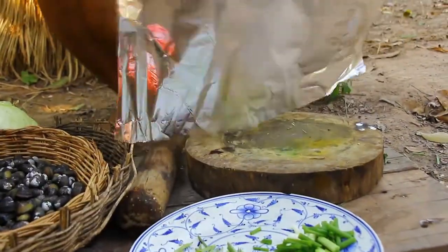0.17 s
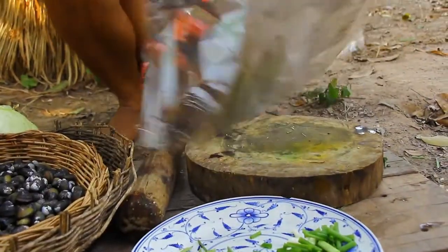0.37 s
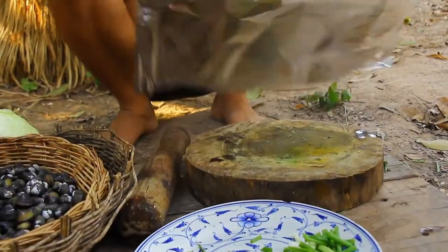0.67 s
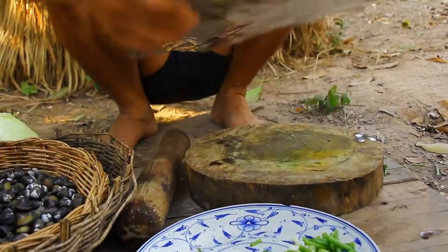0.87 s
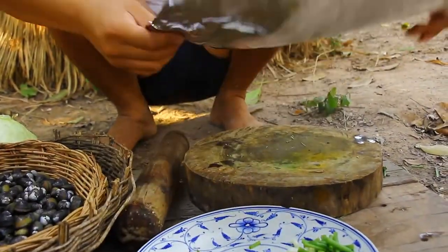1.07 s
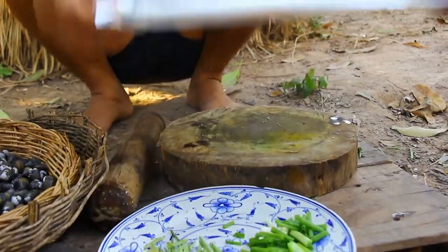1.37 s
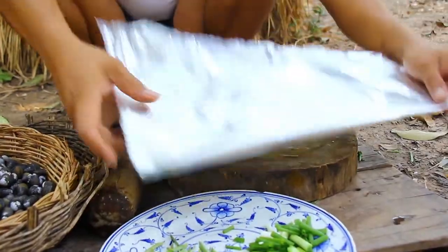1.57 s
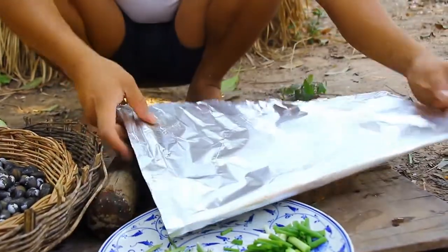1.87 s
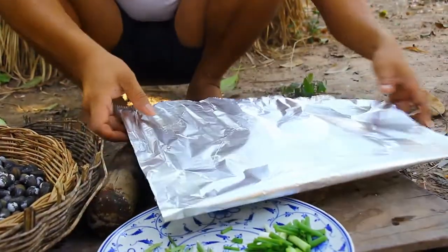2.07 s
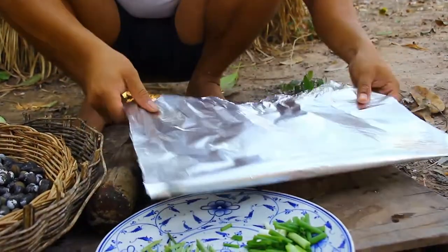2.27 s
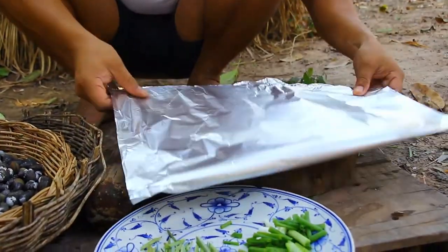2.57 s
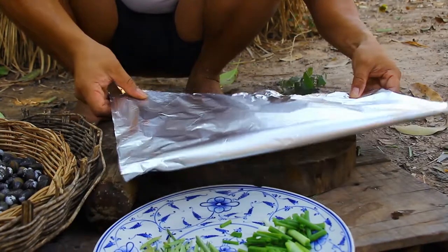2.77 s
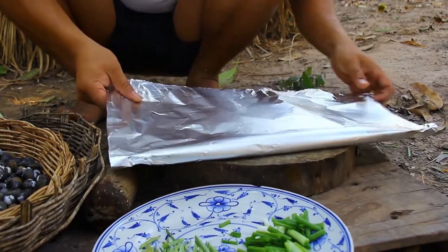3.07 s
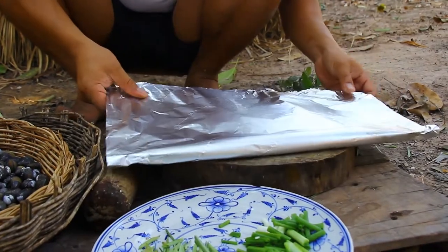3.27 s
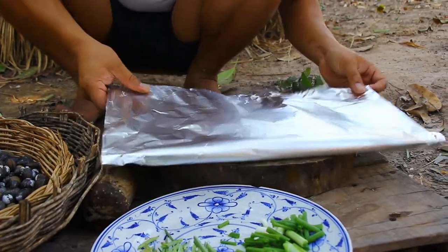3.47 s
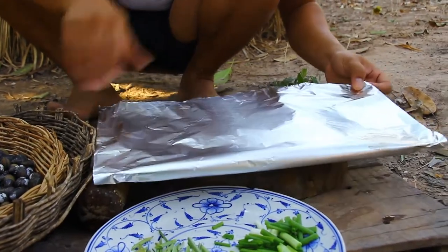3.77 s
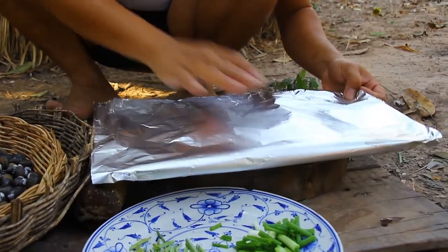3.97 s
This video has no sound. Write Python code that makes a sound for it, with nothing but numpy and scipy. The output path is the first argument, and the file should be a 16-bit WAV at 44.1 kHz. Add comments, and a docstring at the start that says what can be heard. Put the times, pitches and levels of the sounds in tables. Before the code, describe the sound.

Outdoors, close up, hands flex a loose sheet of aluminium foil, which flaps and buckles in bright bursts. After a short lull it is laid on a chopping block with a loud crinkle and one small knock, then pressed flat in more runs of crackling and tiny metallic pings. A far-off engine hums under a steady low rumble, and faint wind brushes the microphone near the end.

```python
"""Outdoors, a sheet of aluminium foil is drawn out in the air, laid over a chopping block and pressed
down by hand. Its creases snap in dense runs and buckle in bursts, and every snap sets the thin sheet
shimmering for a moment. Taut panels ring, dimples ping, the whole sheet flaps, and once it knocks on
something hard. Behind it sit a distant engine hum, an outdoor rumble and a little low wind."""
import sys
import numpy as np
from scipy import signal
from scipy.fft import rfft, irfft, next_fast_len
from scipy.io import wavfile
from scipy.ndimage import map_coordinates

SR = 44100
rng = np.random.default_rng(int(sys.argv[2]) if len(sys.argv) > 2 else 0)


def generate_wav(signal):
    """Clip the signal to [-1, 1] and save it as 16-bit WAV at the path in sys.argv[1]."""
    frames = np.transpose(np.atleast_2d(signal))
    scaled = np.clip(frames, -1, 1) * 32767
    pcm = np.round(scaled).astype(np.int16)
    wavfile.write(sys.argv[1], SR, pcm)


N = 182260
TIME = np.arange(N) / SR
RING_SIZE = SR // 4

# steady flexing; body is how much the broad panels flap along: t/s, crackle level/dB, body/dB
FLEXING = [(0, -21, 2), (.45, -25.5, -1), (.66, -28.5, -2), (.76, -34, 1), (.87, -27, -2.5),
           (1.08, -28, -1), (1.17, -30.5, -1), (1.37, -30, -2), (1.41, -35, -4), (1.66, -31.5, -7),
           (1.74, -29, 1), (1.88, -27, -6.5), (2.1, -24.5, -3), (2.42, -22, -1.5), (2.77, -27, -0.5),
           (3.14, -25.5, 2), (3.24, -34, 7.5), (3.48, -25, 2), (3.72, -28.5, -2), (4.13, -32.5, 3)]
# the hands crumple the sheet in dense runs of snaps: t/s, length/s, level/dB
CRUMPLE_RUNS = [(.003, 0.074, -21), (0.23, 0.095, -22), (0.347, 0.083, -21), (0.545, 0.16, -22),
                (0.824, 0.048, -27.5), (0.922, 0.14, -21), (1.55, 0.066, -23.5), (1.729, 0.091, -17.5),
                (1.88, 0.11, -24), (2.253, 0.1, -16.5), (2.45, 0.16, -25.5), (2.849, 0.25, -24),
                (3.064, 0.058, -19), (3.491, .13, -23.5)]
# big buckles, each a quick avalanche of snaps: t/s, level/dB, brightness/dB
BIG_BUCKLES = [(.009, -15.5, 4), (.137, -16, 1), (.159, -14, 2), (.227, -13, 2.5), (.346, -10.5, 2),
               (.4, -19, 6), (.4668, -9.5, 1.5), (.568, -20.5, 7), (.655, -17.5, 2), (.8, -28.5, 5),
               (1.0, -14, -3), (1.118, -22.5, -1), (1.242, -22.5, 3.5), (1.338, -21.5, -18),
               (1.4505, -30, 9), (1.496, -24.5, -9), (1.55, -24, 13), (1.735, -11.5, -2), (1.795, -13, 3),
               (2.059, -16.5, 4), (2.162, -18.5, -2), (2.364, -21, 14), (2.456, -16.5, -3),
               (2.481, -20.5, 10), (2.535, -13, 0), (2.648, -14.5, -1), (2.772, -27, 7), (2.805, -31, 12),
               (2.864, -14.5, -7), (2.887, -16, 0), (2.94, -16, -10), (2.959, -16.5, 8), (3.1, -20, 5),
               (3.235, -31, 5), (3.313, -29, 7), (3.35, -25, -7), (3.3735, -22, 7.5), (3.416, -26.5, 8.5),
               (3.569, -17.5, -3), (3.761, -23.5, 6.5), (3.802, -19.5, -3), (3.868, -22, -4),
               (3.93, -20, 0), (3.954, -20, -2), (3.992, -21.5, -1), (4.036, -20, -3), (4.059, -24, 2)]
# the tail of a snap, by band: f/Hz, t60/s, energy share of the first crack, brightness tracking (0-1)
SHIMMER_BANDS = [(200, 0.038, 0.24, 0), (900, 0.095, 0.29, 0), (2700, 0.26, 0.41, 0),
                 (6400, 0.12, 0.16, 0.56), (9500, 0.092, 0.2, 0.72), (14000, 0.058, 0.14, 1)]
# panels ringing while held taut: middle t/s, length/s, f/Hz, boost/dB
TAUT_PANELS = [(.36, 0.5, 624, 8), (0.499, 0.96, 1360, 3), (1.15, 0.56, 830, 1.5), (1.52, 0.16, 2520, 6.5),
               (2.38, 0.4, 1070, 8.5), (2.42, 0.58, 2280, 4.5), (2.8, 0.17, 580, 11.5),
               (3.32, 0.15, 715, 6), (3.78, 0.33, 1290, 6), (3.7, 0.74, 372, 10.5)]
# EQ of the sheet hanging free: f/Hz, level/dB
FREE_EQ = [(60, -23), (130, -7.5), (280, -3.5), (450, -16.5), (800, -4.5), (1200, -8), (2000, -2.5),
           (2900, -0.5), (4300, -1.5), (6000, -1), (7500, -3), (9500, -10), (13000, -12.5), (16000, -18.5)]
# EQ of the sheet lying on the block: f/Hz, level/dB
LAID_EQ = [(150, -29), (300, -11), (500, -17), (730, -3), (1050, -12.5), (1500, -0.5), (2300, -1),
           (3300, -1.5), (4300, -3), (5100, -0.5), (7300, -3.5), (9500, -11.5), (13000, -15),
           (16000, -18.5)]
# dull flaps of the whole sheet: t/s, level/dB, f/Hz
SHEET_FLAPS = [(.085, -14.5, 239), (.145, -23, 185), (.35, -19, 228), (.41, -21.5, 245), (.471, -32, 196),
               (.995, -21, 129), (1.736, -24, 707), (1.741, -23, 310), (3.11, -18, 209)]
# dimples popping through with a pitch: t/s, level/dB, f/Hz
DIMPLE_PINGS = [(.4672, -15, 4050), (1.387, -16, 7300), (1.496, -20, 5940), (1.572, -17, 2670),
                (1.663, -20.5, 1870), (2.655, -23, 2410), (3.1, -9, 1760), (3.3502, -17, 4240)]
# the foil knocks on something hard: t/s, level/dB
KNOCK_HITS = [(2.0756, -13.5)]
# modes of that knock: f/Hz, level/dB, t60/s
KNOCK_RING = [(453, -12, 0.045), (820, -2, 0.019), (1080, 5, 0.0072), (2380, 2, 0.013), (4000, 2, 0.0062)]
# engine hum: multiple of the firing rate, level/dB
ENGINE_PARTIALS = [(2, -56), (3, -55), (5, -56.5), (6, -39), (7, -46.5), (9, -46), (10, -44.5), (15, -60)]
# EQ of the outdoor rumble: f/Hz, level/dB
RUMBLE_EQ = [(20, -22), (38, -13), (58, 1.5), (95, -1), (130, 4.5), (200, 1.5), (320, -1), (400, -15.5),
             (520, -9.5), (750, -12), (1100, -14.5), (3000, -6), (8000, -34), (16000, -42)]
# shared fader for engine and rumble: t/s, level/dB
DISTANT_FADER = [(0, -1.5), (.5, -9), (1.1, 1), (4.13, 0.9)]
# swell of the wind: t/s, level/dB
WIND_FADER = [(0, -72), (3, -58), (4.13, -48)]
# EQ of the wind: f/Hz, level/dB
WIND_EQ = [(15, -14), (30, -25), (48, 16), (70, 7), (130, -24), (400, -60), (2000, -90)]

LOWERING_S = (1.63, 1.79)   # the sheet comes down onto the block
USUAL_LEVEL_DB = -25.5   # reference for crackle brightness and buckle length


def foil(free_treble_db=-3.5, laid_treble_db=-6, treble_tracking=0.15):
    """Crackle and buckles sound through the sheet: crisper when flexed hard, duller on the block."""
    flex_db, body_db = in_time(FLEXING)
    laid = np.interp(TIME, LOWERING_S, [0, 1])
    level_db = 10 * np.log10(from_db(flex_db) ** 2 + crumples())
    treble_db = (1 - laid) * free_treble_db + laid * laid_treble_db
    treble_db += treble_tracking * (level_db - USUAL_LEVEL_DB)
    sheet = crackle(level_db, treble_db) + buckles(BIG_BUCKLES + small_buckles(flex_db))
    sheet = panels(low_shelf(sheet, body_db, corner_hz=1200))
    return (1 - laid) * coloured(sheet, FREE_EQ) + laid * coloured(sheet, LAID_EQ)


def crackle(level_db, treble_db, snaps_per_s=870, bright_spread_db=7, flicker_db=2.5):
    """Creases snap at random, in dull and sharp clumps; harder flexing makes them come faster."""
    chance = np.clip(snaps_per_s * from_db(level_db - np.mean(level_db)) / SR, 1e-4, 1)
    sizes = snap_sizes(N, spread_db=-1)
    fires = rng.random(N) < chance
    snaps = fires * sizes / np.sqrt(chance * np.mean(sizes ** 2)) * from_db(level_db)
    scatter_db = bright_spread_db * np.clip(rng.standard_normal(N), -2, 2) + flicker_db * drift(70)
    return shimmer(snaps, treble_db + scatter_db)


def crumples(attack_s=0.0079, release_s=0.018):
    """Power envelope of the crackle while the hands crumple: fast attack, hold, release."""
    power = np.zeros(N)
    for s, length, level_db in CRUMPLE_RUNS:
        attack = np.clip((TIME - s) / attack_s, 0, 1)
        release = np.exp(-np.maximum(TIME - s - length, 0) / release_s)
        power += (from_db(level_db) * attack * release) ** 2
    return power


def buckles(events, usual_length_s=0.008, doubling_db=9.5, snaps_per_s=900, lead_db=4, count=48):
    """One crease gives way and its neighbours follow, for longer in a strong buckle."""
    snaps, brightness = np.zeros(N), np.zeros(N)
    for s, level_db, bright_db in events:
        length = usual_length_s * 2 ** ((level_db - USUAL_LEVEL_DB) / doubling_db)
        delays = rng.random(count) * length
        sizes = snap_sizes(count, spread_db=1.5)
        if s + length >= TIME[-1]:
            continue
        delays[0], sizes[0] = 0, from_db(lead_db)
        used = int(np.clip(2 + snaps_per_s * length, 2, count))
        at = ((s + delays[:used]) * SR).astype(int)
        strength = from_db(level_db) * np.sqrt(SR / 100)   # the energy of 10 ms at this level
        snaps[at] = strength * sizes[:used] / np.linalg.norm(sizes[:used])
        brightness[at] = bright_db
    return shimmer(snaps, brightness)


def small_buckles(flex_db, per_s=16, slack_db=-32, level_spread_db=3.5, bright_spread_db=10.5):
    """Strain lets go at random unless the sheet is slack: rows of t/s, level/dB, brightness/dB."""
    wait, size, sharp = rng.random((112, 3)).T
    s = np.cumsum(-np.log(1 - wait)) / per_s
    strain_db = np.interp(s, TIME, flex_db)
    level_db = strain_db + 1 + level_spread_db * (2 * size - 1)   # centred just above the crackle
    bright_db = 1.5 + bright_spread_db * (2 * sharp - 1)
    return list(np.transpose([s, level_db, bright_db])[strain_db > slack_db])


def snap_sizes(count, spread_db):
    """Snaps flip either way; a few stand out louder, or drop back if the spread is negative."""
    return from_db(spread_db * np.minimum(rng.exponential(1, count), 4)) * rng.choice([-1, 1], count)


def shimmer(snaps, bright_db, click_share=0.15, crack_t60_s=0.009):
    """Each snap gives a click, a crack smeared by the bending waves, then modes dying band by band."""
    log_hz = np.log(np.fft.rfftfreq(N, 1 / SR) + 1)
    centres = np.log([row[0] for row in SHIMMER_BANDS])
    modes = rfft(mottled(rng.standard_normal(N)))
    out = np.zeros(N)
    for (_, t60, crack, tracking), pick in zip(SHIMMER_BANDS, np.eye(len(centres))):
        band = np.interp(log_hz, centres, pick)
        kicks = snaps * from_db(tracking * bright_db)
        energy = crack * decay(kicks ** 2, crack_t60_s) + (1 - crack) * decay(kicks ** 2, t60)
        ring = np.sqrt((1 - click_share) * energy) * irfft(modes * band, N)
        click = np.sqrt(click_share) * irfft(rfft(kicks) * band, N)
        out += ring + click
    return out


def decay(energy, t60):
    """Spread each parcel of energy over an exponential tail."""
    keep = from_db(-120 / (t60 * SR))
    return signal.lfilter([1 - keep], [1, -keep], energy + 1e-18)


def mottled(x, depth_db=2.5, spacing_hz=110.7, changes_per_s=7.01):
    """The sheet's modes bunch into small peaks and valleys that wander as it bends."""
    hz, t, frames = signal.stft(x, SR, nperseg=1024)
    field = rng.standard_normal((256, 64))
    places = np.meshgrid(hz / spacing_hz, t * changes_per_s, indexing="ij")
    gain = from_db(depth_db * map_coordinates(field, places, order=1, mode="mirror"))
    return signal.istft(frames * gain / np.sqrt(np.mean(gain ** 2)), SR, nperseg=1024)[1][:N]


def panels(x, q=11):
    """A taut panel picks one pitch out of the crackle, swelling and fading as the sheet bends."""
    out = x.copy()
    for s, length, hz, boost_db in TAUT_PANELS:
        taut = np.exp(-(2 * (TIME - s) / length) ** 4)
        ring = signal.lfilter(*signal.iirpeak(hz, q, fs=SR), x * taut + 1e-18)
        out += (from_db(boost_db) - 1) * ring
    return out


def patch_flips(events, t60, spread_octaves, rise_s, count=8):
    """A patch of the sheet flips over and stirs a handful of modes around one pitch."""
    t, out = TIME[:RING_SIZE], np.zeros(N)
    for s, level_db, hz in events:
        pitches = hz * 2 ** (spread_octaves * rng.uniform(-0.78, 1, (count, 1)))
        modes = np.sin(2 * np.pi * (pitches * t + rng.random((count, 1)))).sum(0) / np.sqrt(count)
        envelope = (1 - np.exp(-t / rise_s)) * from_db(-60 * t / t60)
        add(out, s, from_db(level_db) * modes * envelope)
    return out


def knock():
    """The foil meets something hard: a short, dead tap in a few heavily damped modes."""
    t, out = TIME[:RING_SIZE], np.zeros(N)
    tap = -sum(from_db(db - 60 * t / t60) * np.sin(2 * np.pi * hz * t) for hz, db, t60 in KNOCK_RING)
    for s, level_db in KNOCK_HITS:
        add(out, s, from_db(level_db) * tap)
    return out


def engine(firing_hz=26.42, speed_wander=0.0022, flutter_db=1.05):
    """One soft exhaust pulse per firing; each partial wavers a little on its way through the air."""
    firings = np.cumsum(firing_hz * (1 + speed_wander * drift(2.8))) / SR
    return sum(np.sqrt(2) * from_db(db + flutter_db * drift(7)) * np.sin(2 * np.pi * k * firings)
               for k, db in ENGINE_PARTIALS)


def rumble(gain_db=-36):
    """The outdoor bed: dark, steady noise."""
    return from_db(gain_db) * coloured(rng.standard_normal(N), RUMBLE_EQ)


def wind():
    """Wind brushes the microphone: a faint bass noise that slowly swells."""
    return from_db(in_time(WIND_FADER)[0]) * coloured(rng.standard_normal(N), WIND_EQ)


def coloured(x, eq):
    """Apply an EQ curve on a log-frequency axis; white noise keeps its power."""
    size = next_fast_len(N + RING_SIZE)
    hz = np.maximum(np.fft.rfftfreq(size, 1 / SR), 1)
    eq_hz, eq_db = np.transpose(eq)
    gain = from_db(np.interp(np.log(hz), np.log(eq_hz), eq_db))
    return irfft(rfft(x, size) * gain / np.sqrt(np.mean(gain ** 2)), size)[:N]


def low_shelf(x, gain_db, corner_hz):
    """Boost or cut the lows."""
    lows = signal.sosfiltfilt(signal.butter(2, corner_hz, "low", fs=SR, output="sos"), x)
    return x + (from_db(gain_db) - 1) * lows


def drift(per_s):
    """Slow random wander of spread about 1."""
    knots = rng.standard_normal(512)
    return np.interp(TIME * per_s, np.arange(len(knots)), knots)


def from_db(db):
    """Decibels to gain."""
    return 10 ** (np.asarray(db) / 20)


def in_time(rows):
    """Each column of an automation curve at every sample."""
    s, *columns = np.transpose(rows)
    return [np.interp(TIME, s, column) for column in columns]


def add(track, s, sound):
    """Mix a sound into a track at time s."""
    start = int(np.clip(round(s * SR), 0, N - 1))
    track[start:start + len(sound)] += sound[:N - start]


def scene():
    """Foil up front, engine and rumble far back, a little wind; all panned centre."""
    background = from_db(in_time(DISTANT_FADER)[0]) * (engine() + rumble()) + wind()
    flaps = patch_flips(SHEET_FLAPS, t60=0.11, spread_octaves=0.423, rise_s=0.0059)
    pings = patch_flips(DIMPLE_PINGS, t60=0.03, spread_octaves=0.15, rise_s=0.00067)
    mono = foil() + flaps + pings + knock() + background
    return np.array([mono, mono])


def record(dry):
    """Soft clipping rounds the tallest peaks, then a steep high cut takes off the very top."""
    ceiling, cutoff_hz = 1.5, 15900
    high_cut = signal.ellip(12, .1, 80, cutoff_hz, fs=SR, output="sos")
    return signal.sosfilt(high_cut, ceiling * np.tanh(dry / ceiling))


dry = scene()
out = record(dry)
generate_wav(out)
```